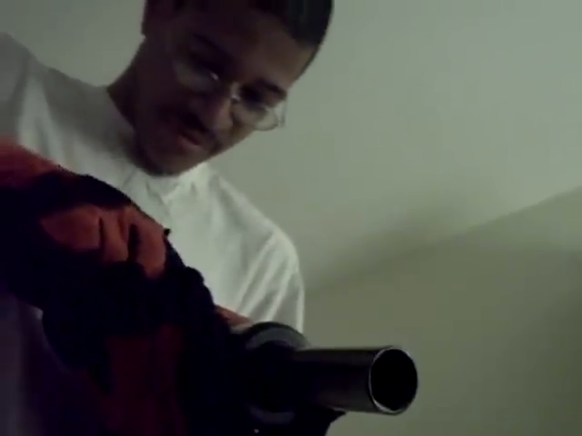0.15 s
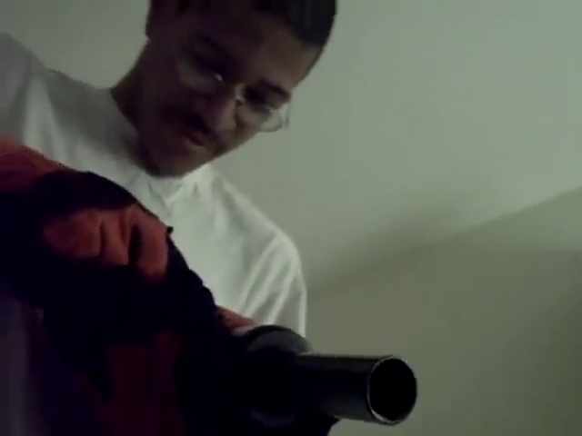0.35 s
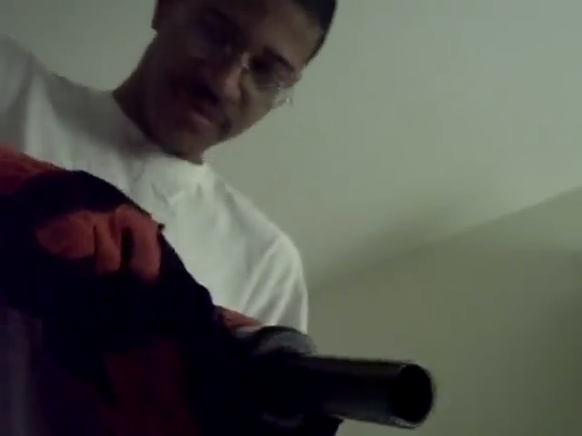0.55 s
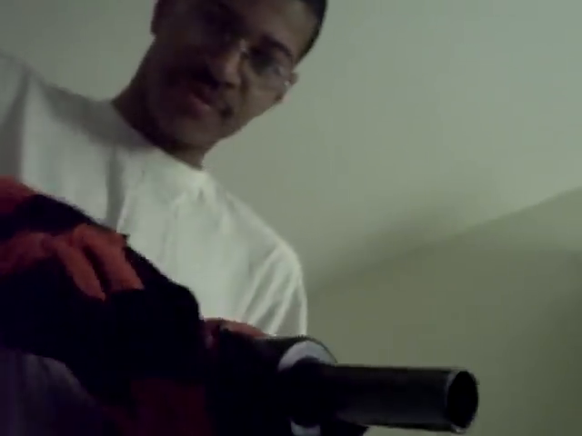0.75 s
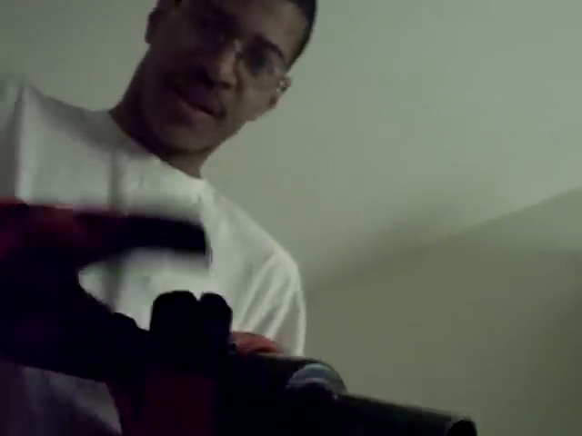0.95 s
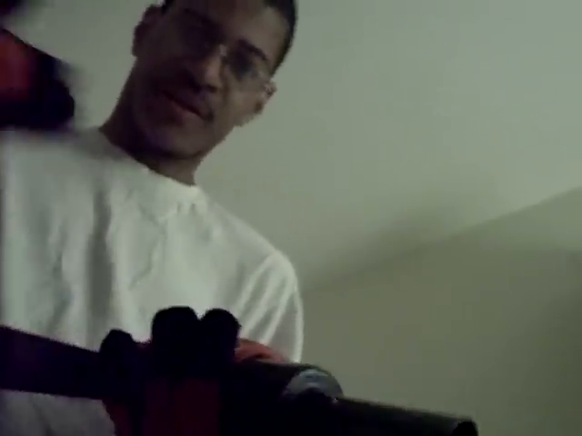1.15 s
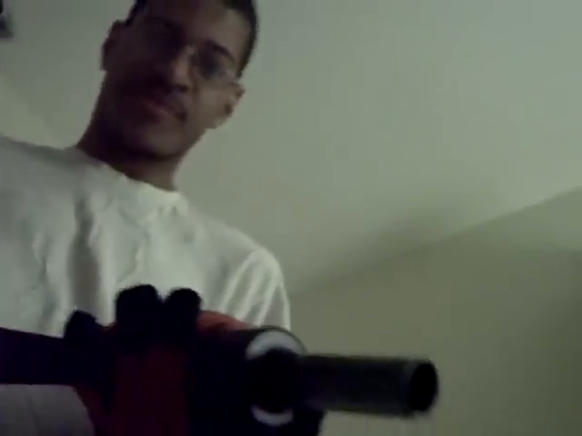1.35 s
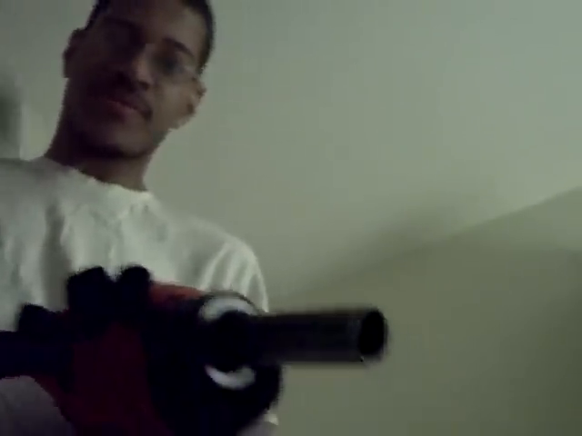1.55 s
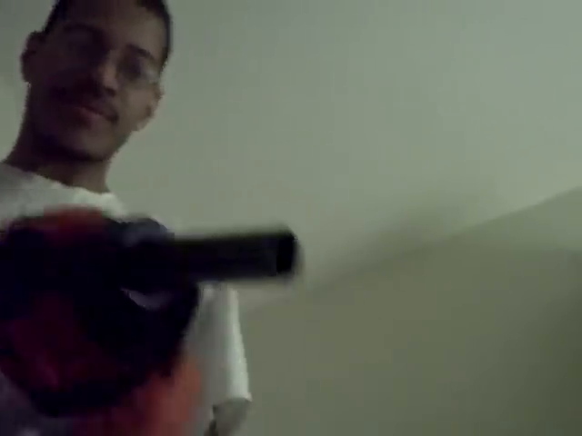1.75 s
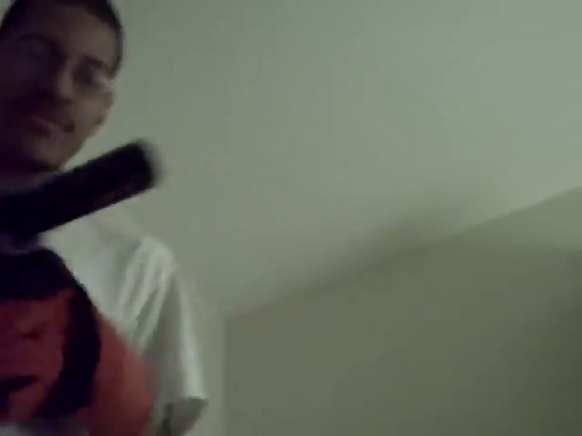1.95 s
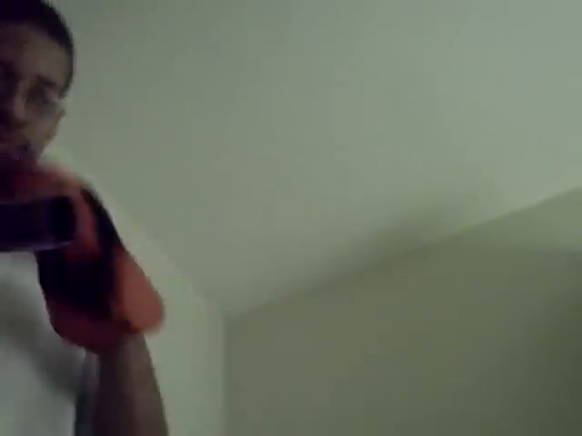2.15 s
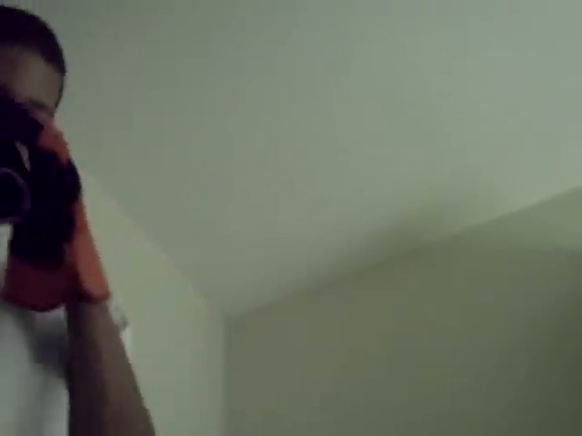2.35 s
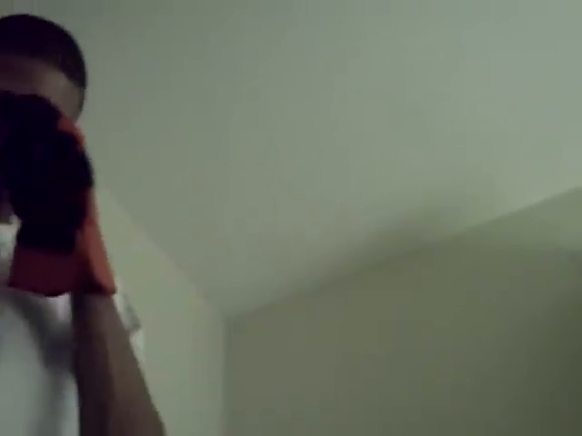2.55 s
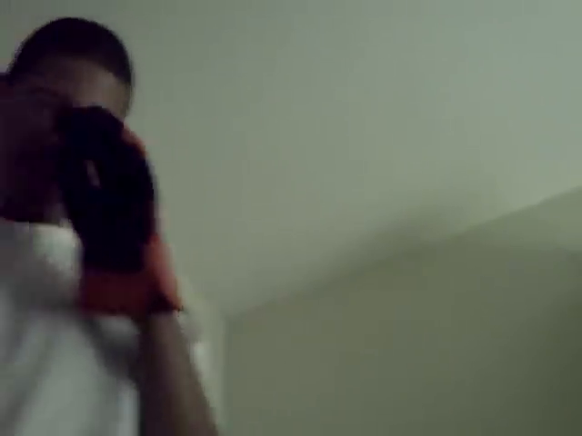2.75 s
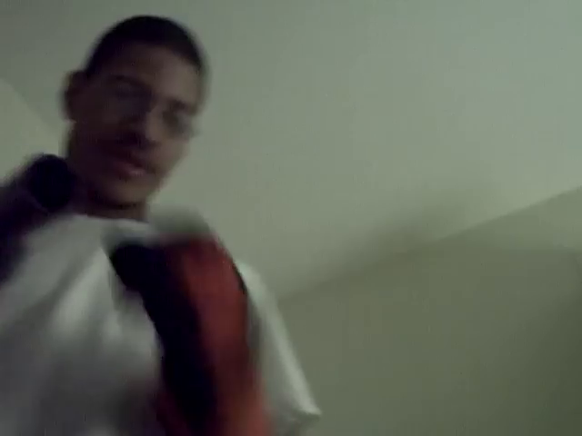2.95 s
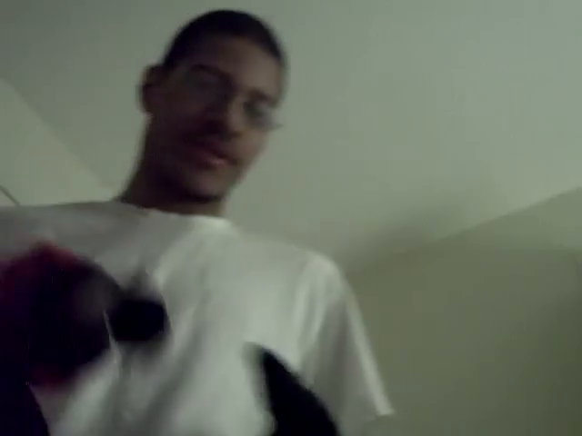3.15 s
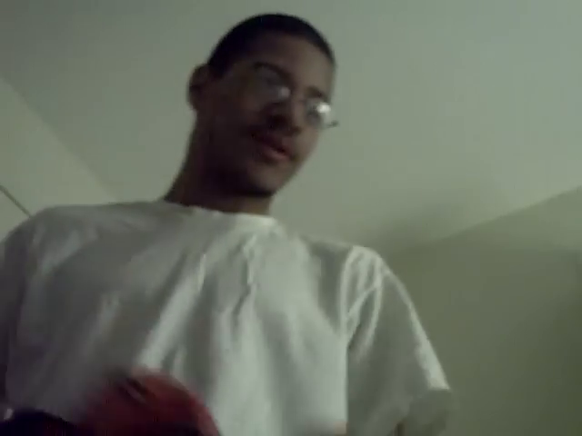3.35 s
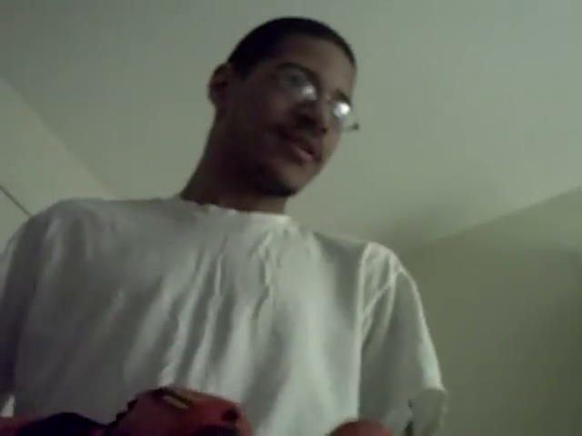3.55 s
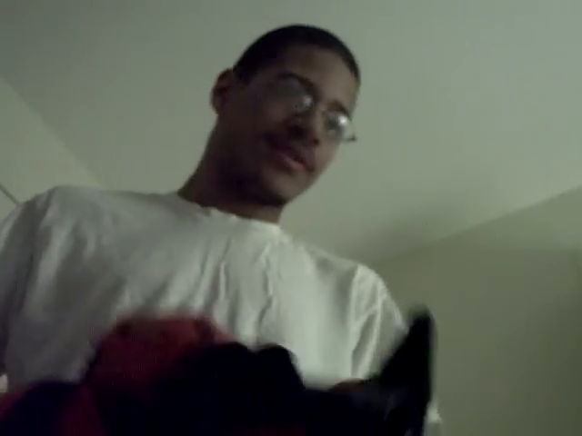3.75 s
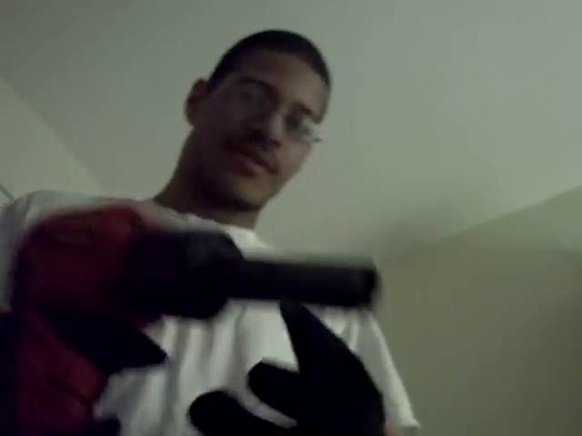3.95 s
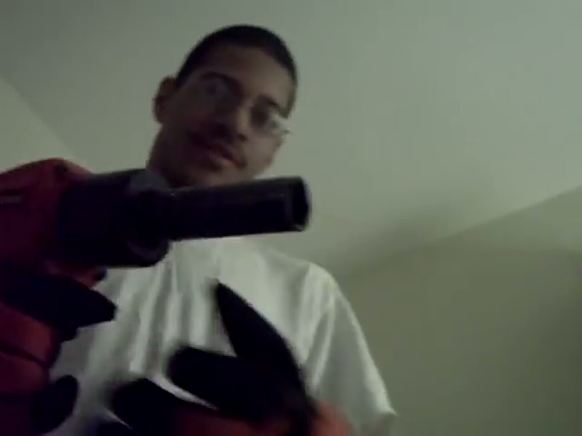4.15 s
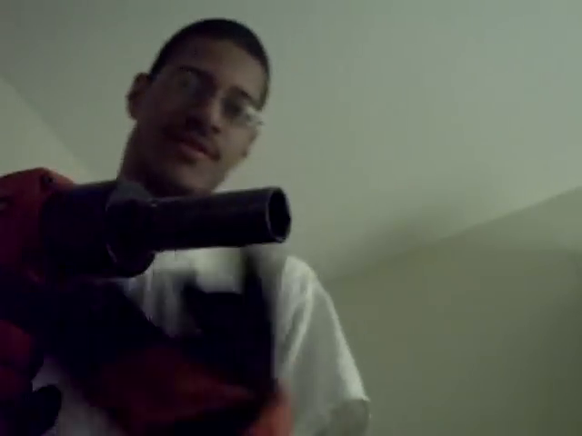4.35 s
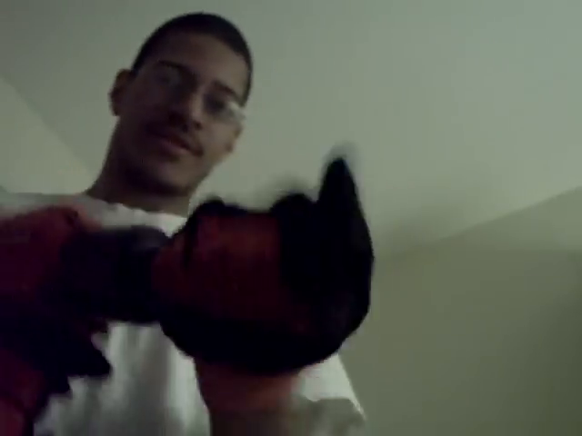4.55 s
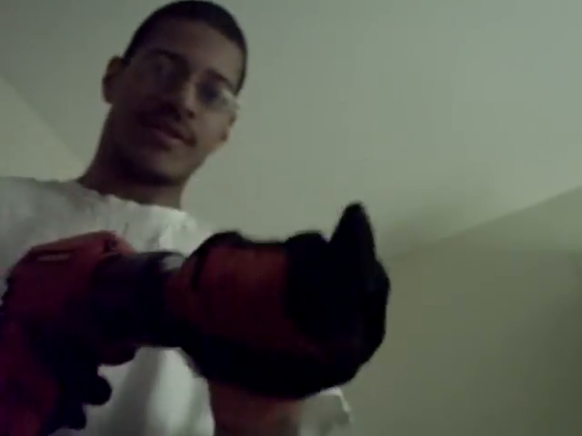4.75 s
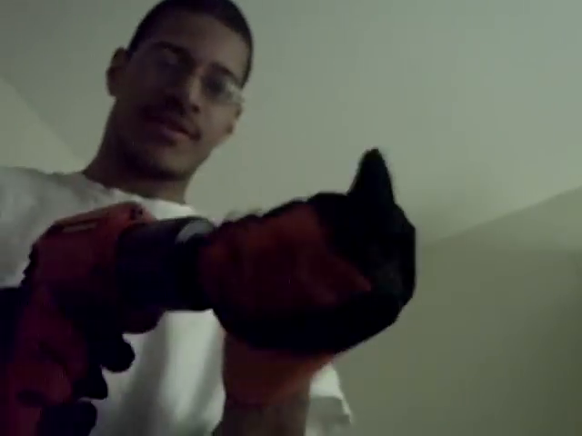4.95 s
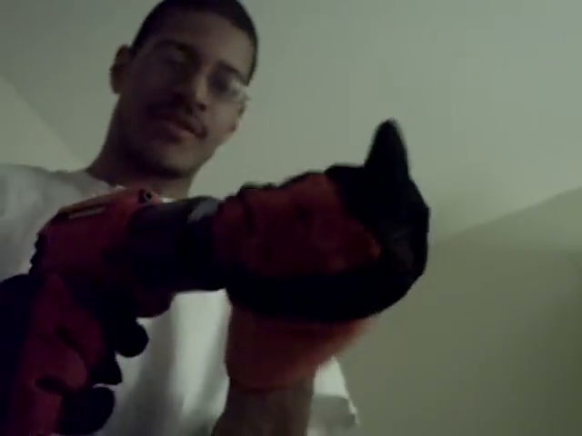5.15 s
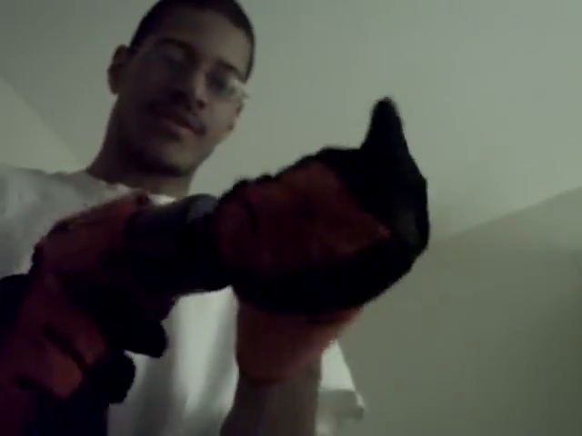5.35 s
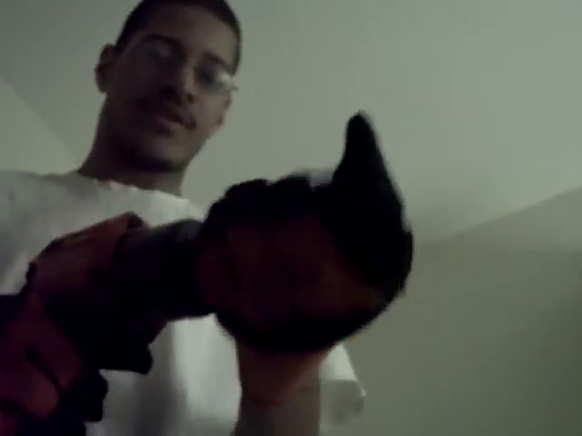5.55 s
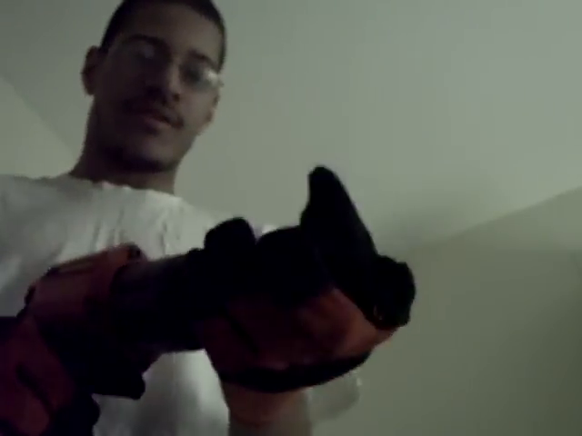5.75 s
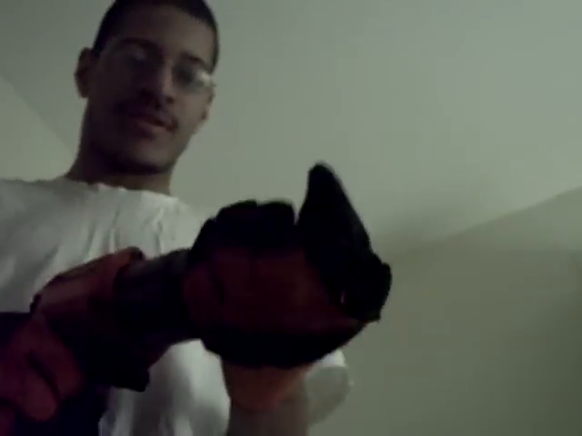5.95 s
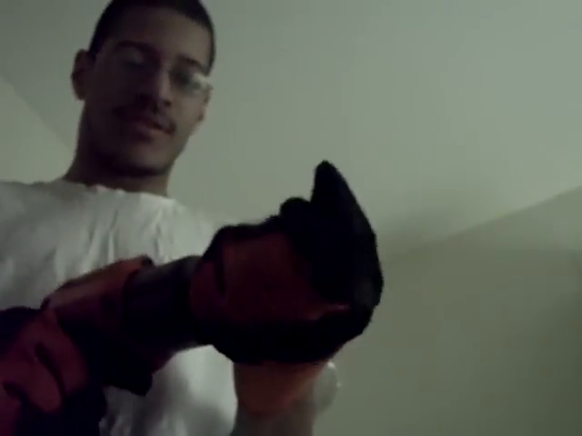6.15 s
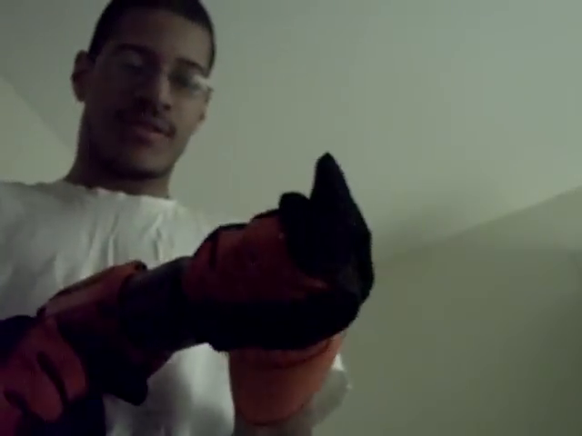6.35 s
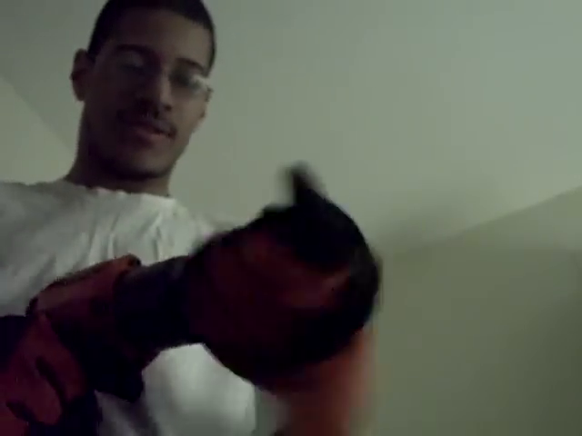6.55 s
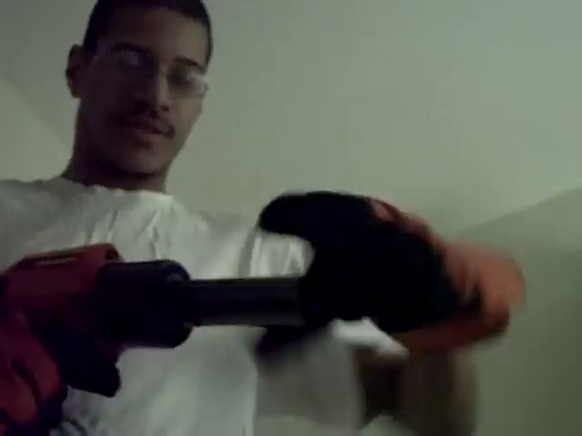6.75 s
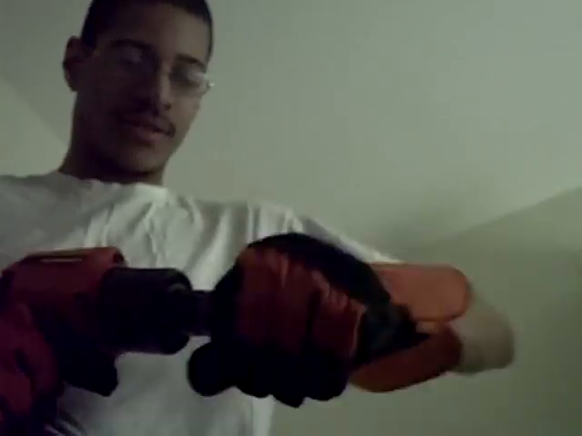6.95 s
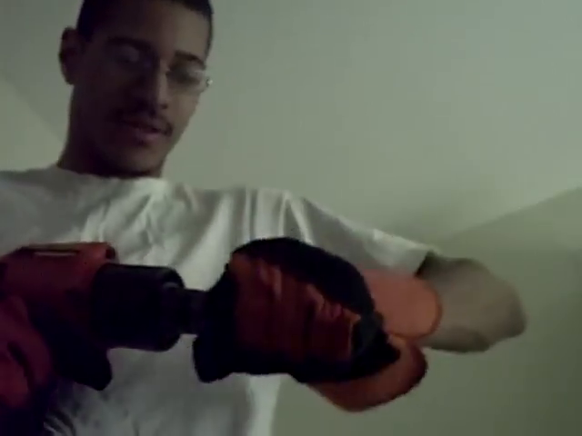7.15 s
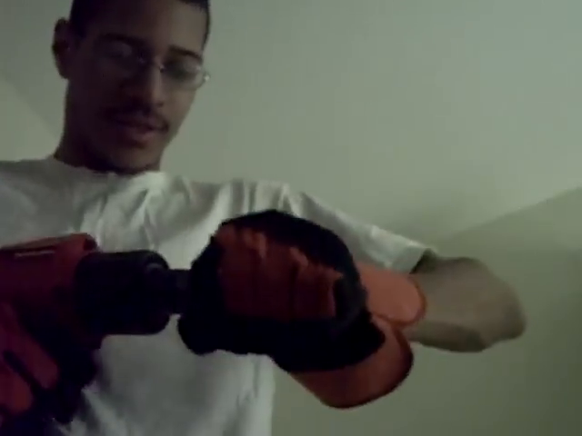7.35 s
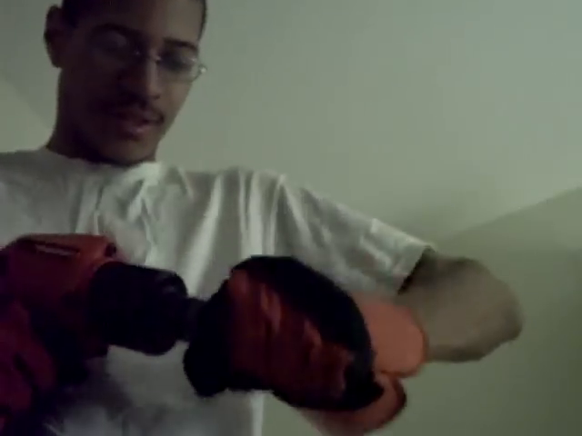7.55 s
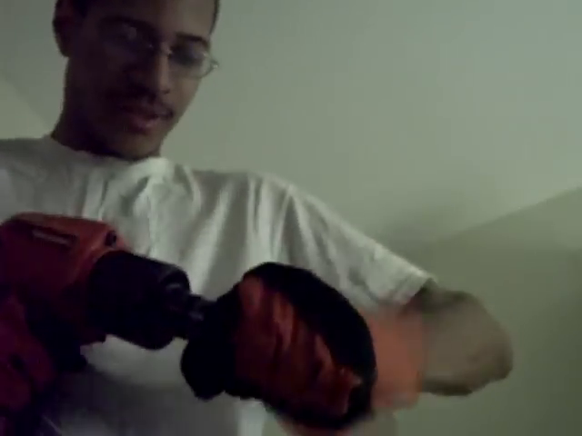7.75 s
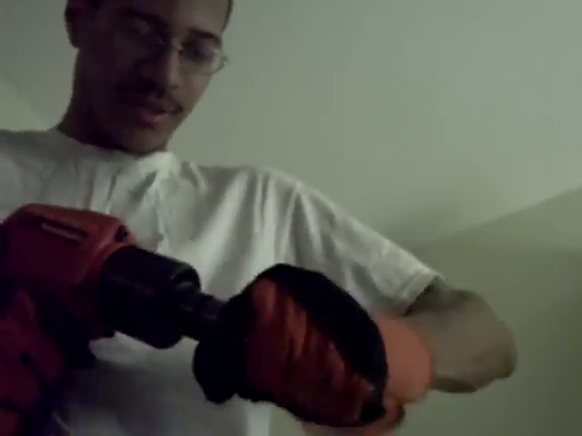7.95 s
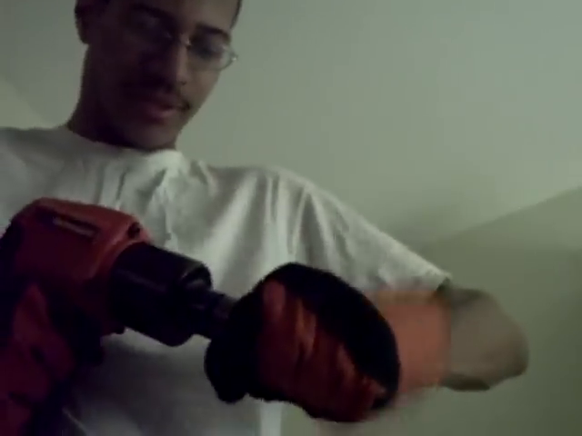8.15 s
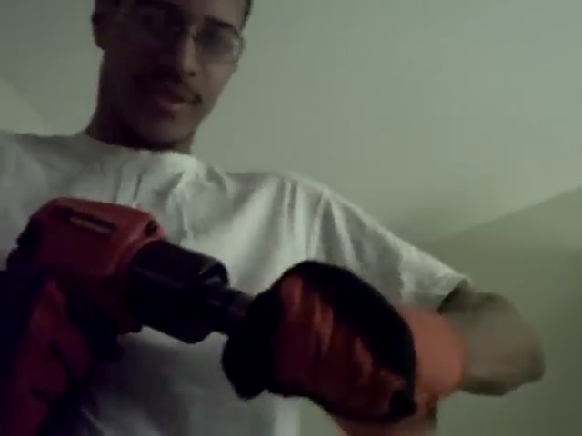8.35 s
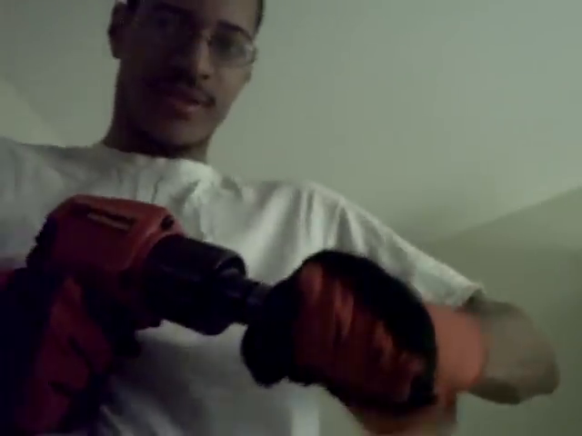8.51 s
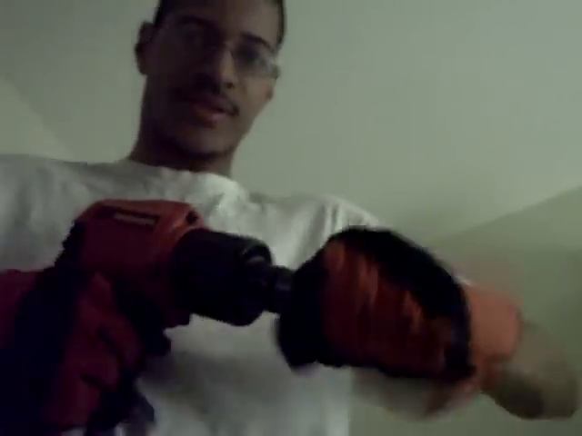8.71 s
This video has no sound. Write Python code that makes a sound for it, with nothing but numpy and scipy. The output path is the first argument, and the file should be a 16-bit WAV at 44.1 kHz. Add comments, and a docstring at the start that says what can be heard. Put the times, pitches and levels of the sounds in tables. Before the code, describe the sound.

A piston compressor hums steadily with a low buzzing drone, thin whistle and airy hiss. After nearly five seconds a pneumatic impact wrench fires close to a small camera microphone: about eight rapid clanking blows with puffing exhaust. The hum returns alone for two seconds, then a longer, louder run of about sixteen blows rattles out and stops near the end. Short hard garage reflections; peaks distort.

```python
"""Air impact wrench in a garage

An air wrench is fired twice close to a small camera, its socket held back by a gloved hand.
In each stroke the socket knocks, then the air motor speeds up with quickening puffs of exhaust noise and air.
The hammer's blow is a burst of noise that clanks and rings; a steady hiss lasts while the trigger is held.
Behind, a piston compressor hums in harmonics, whistles and hisses; the man leaning in shadows some of its hum.
The walls throw the wrench back, and the loudest peaks are flattened by the overloaded microphone circuit."""
import sys
import numpy as np
from scipy import signal
from scipy.fft import rfft, irfft, next_fast_len
from scipy.io import wavfile
from scipy.ndimage import uniform_filter1d, map_coordinates

SR = 44100
rng = np.random.default_rng(int(sys.argv[2]) if len(sys.argv) > 2 else 0)


def output_pcm(signal):
    """Save a mono or channel-first signal as 16-bit PCM at the path in sys.argv[1].

    Samples are clipped to [-1, 1] before scaling.
    """
    pcm = np.clip(np.atleast_2d(signal).T, -1, 1) * 32767
    wavfile.write(sys.argv[1], SR, np.round(pcm).astype(np.int16))


N = 387191
T = np.arange(N) / SR  # time of every sample, s
SHAFT_HZ = 56.385  # compressor turns per second

# wrench strokes: hammer blow t/s, wind-up before it t/s, relative blow level/dB
STROKES = [(4.856, 0.029, -4), (4.929, 0.027, -3), (4.986, 0.028, -2), (5.083, 0.038, -2),
           (5.175, 0.033, -8), (5.262, 0.027, -8), (5.357, 0.035, -2), (5.448, 0.051, -3),
           (7.541, 0.038, 3.5), (7.577, .023, 0), (7.659, 0.031, -3), (7.743, .027, 1), (7.821, .031, -2),
           (7.901, .029, -3.5), (7.980, .031, 0), (8.061, 0.027, -1), (8.142, .035, -4), (8.229, 0.034, -1),
           (8.311, 0.026, -1), (8.396, 0.032, -2), (8.481, 0.03, 1), (8.563, .028, -2.5),
           (8.644, .030, 4.5), (8.730, 0.028, -1)]
# trigger pulls: start t/s, end t/s, relative throttle hiss level/dB, puff pitch at top speed f/Hz,
# relative puff level/dB, relative socket knock level/dB
PULLS = [(4.792, 5.465, -25, 530, 6, -5.5), (7.478, 8.79, -29, 617, 7.5, -8)]


def undb(db):
    """Turn decibels into a gain."""
    return 10 ** (np.asarray(db) / 20)


def unit(x):
    """Scale a sound to an rms level of 1."""
    return x / np.sqrt(np.mean(x ** 2))


def curves(table):
    """Draw each column of a table against its times, at every sample."""
    s, *columns = np.transpose(table)
    return [np.interp(T, s, column) for column in columns]


def add(track, s, sound):
    """Mix a sound into the track at time s."""
    i = int(s * SR)
    track[i:i + len(sound)] += sound[:max(N - i, 0)]


def colour(x, points, peaks=()):
    """Filter by (Hz, dB) points plus (Hz, width in Hz, dB) resonances, with no sound ahead of its cause."""
    size = 2 * next_fast_len(len(x) // 2 + 4096)
    f = np.fft.rfftfreq(size, 1 / SR)
    hz, db = np.transpose(points)
    power = undb(np.interp(np.log(f + 1), np.log(hz), db)) ** 2
    for centre, width, peak_db in peaks:
        power = power + undb(peak_db) ** 2 / (1 + ((f - centre) / width) ** 2) ** 2
    # folding the cepstrum (the spectrum of the log spectrum) onto positive times removes pre-echo
    cepstrum = irfft(np.log(power) / 2)
    cepstrum[1:size // 2] *= 2
    cepstrum[size // 2 + 1:] = 0
    response = np.exp(rfft(cepstrum))
    return irfft(rfft(x, size) * response)[:len(x)]


def walk(rate):
    """Wander by chance with a spread near 1, through 'rate' random points per second."""
    knots = rng.standard_normal(int(N / SR * rate) + 2)
    return np.interp(T * rate, np.arange(len(knots)), knots)


def fade(t, t60):
    """Die away exponentially, 60 dB down after t60 seconds."""
    return undb(-60 * t / t60)


def pull_at(s):
    """Find the row of the latest trigger pull begun before time s."""
    return [pull for pull in PULLS if pull[0] < s][-1]


def motor(speed_up=1.893, swell=0.49, glide=0.53, cycles=0.43, skew=0.14, scatter_db=3.0,
          rush_db=-27, rush_t60=0.027, leak_db=-35, first_db=-12):
    """The rotor speeds up evenly; each vane passing the port lets out a puff, shorter and harder with speed."""
    # how the exhaust port radiates the puffs: f/Hz, level/dB
    port = [(20, -1.5), (60, 2.5), (110, -2.5), (180, 1), (300, 0), (480, -3), (750, 1), (1300, 1.5),
            (3000, -4)]
    # rush of the exhaust air: f/Hz, level/dB
    exhaust = [(40, 14), (150, 8), (400, 1), (1000, 20.5), (1900, 8), (2800, 2.5), (4000, 3), (6500, -6),
               (9300, 3), (12000, -17)]
    usual_wind_up_s, haste = 0.026, 1.14  # a quicker wind-up than usual makes stronger puffs
    vane_gap_s, lead_s, first_s = .0068, .0015, .011  # mean puff gap; last puff before blow; weak puff before start
    puffs, flow, leak = np.zeros(N), np.zeros(N), np.zeros(N)
    t = np.arange(-SR // 200, SR // 25) / SR
    for blow, wind_up, _ in STROKES:
        _, _, _, puff_hz, puff_db, _ = pull_at(blow)
        push = undb(puff_db) * (usual_wind_up_s / wind_up) ** haste
        start, span = blow - wind_up, wind_up - lead_s
        count = int(round(span / vane_gap_s)) + 1
        # equal steps of turning make equal steps in speed squared
        speeds = np.sqrt(np.linspace(1 / speed_up ** 2, 1, count))  # share of the top speed
        times = start + span * (speeds - speeds[0]) / (1 - speeds[0])
        vanes = [(start - first_s, speeds[0], first_db)]  # a weak puff as the rotor breaks free
        vanes += [(s, speed, 0) for s, speed in zip(times, speeds)]
        chance = rng.standard_normal((12, 3))
        for (s, speed, db), (late, loud, sharp) in zip(vanes, chance):
            s = s + 0.00032 * late + t[0]
            size = push * undb(db + scatter_db * loud) * speed ** swell
            phase = t * puff_hz * speed ** glide * (1 + sharp / 12)
            puff = -np.cos(2 * np.pi * phase + skew) * np.exp(-(phase / cycles) ** 2)
            add(puffs, s, size * puff)
            add(flow, s, size * (t > 0) * fade(np.abs(t), rush_t60))
        # air slips past the vanes through the wind-up and on while the rotor stands
        leak[(T > start) & (T < blow + .035)] = 1
    air = (undb(rush_db) * flow + undb(leak_db) * leak) * rng.standard_normal(N)
    return colour(puffs, port) + colour(air, exhaust)


def hammer(tick_db=-1, tick_t60=0.018, clank_db=-1, clank_t60=0.043, knock_t60=0.016, rattle_db=-6,
           rattle_s=.05, ring_db=-29, grit_db=0.5, vary_db=2.5):
    """Steel strikes steel: gritty contacts clank in the case and ring anvil and socket, damped by the glove.
    The loose socket knocks on the drive square as each wind-up begins, and rattles once more soon after."""
    # sharp tick of anvil and socket: f/Hz, level/dB
    steel = [(200, 0.5), (600, 6.5), (1500, -12), (2900, 1), (3800, -6.5), (4900, -1.5), (6300, -6),
             (8000, 0.5), (9300, 4.5), (10500, 1.5), (12000, -2.5)]
    # ringing modes of the steel: f/Hz, time to fall 60 dB t/s, relative level/dB
    rings = [(3070, 0.093, 8), (4810, 0.061, 2.5), (5130, .13, -12), (7700, .07, -11), (9700, .06, 9),
             (10100, .05, -4)]
    # clank of the hammer case: f/Hz, level/dB
    case_tone = [(100, -23), (300, 7), (700, 7.5), (1250, -2), (1620, 5), (2050, -3.5), (2750, -1),
                 (3400, -10.5), (4200, -12), (6000, -14.5), (12000, -12)]
    seating_s, seating_db = 4.804, -6.5  # the socket clicks into its seat on the first pull
    t = np.arange(SR // 5) / SR
    anvil, case = np.zeros(N), np.zeros(N)  # loudness of the contacts over time
    for blow, wind_up, db in STROKES:
        clank_size, knock_size, rattle_size = undb(vary_db * rng.standard_normal(3))
        add(anvil, blow, undb(tick_db + db) * fade(t, tick_t60))
        add(case, blow, undb(clank_db) * clank_size * fade(t, clank_t60))
        *_, knock_db = pull_at(blow)
        knock = undb(knock_db) * fade(t, knock_t60)
        start = blow - wind_up
        add(anvil, start, knock_size * knock)
        add(anvil, start + rattle_s * rng.random(), undb(rattle_db) * rattle_size * knock)
    add(anvil, seating_s, undb(seating_db) * fade(t, knock_t60))
    contacts = unit(undb(grit_db * walk(1200)))  # the faces bounce unevenly
    chatter = anvil * contacts * rng.standard_normal(N)
    clank = colour(case * contacts * rng.standard_normal(N), case_tone)
    ring = sum(undb(db) * np.sin(2 * np.pi * hz * t) * fade(t, t60) for hz, t60, db in rings)
    ringing = signal.fftconvolve(chatter, ring / 10)[:N]
    return clank + colour(chatter, steel) + undb(ring_db) * ringing


def throttle():
    """Air squeezing through the throttle valve hisses thinly for as long as the trigger is held."""
    # tone of the throttle hiss: f/Hz, level/dB
    valve_tone = [(100, -30), (3500, -4), (4500, -1), (5000, 5.5), (5600, -3.5), (8000, -0.5), (10500, 2),
                  (12500, -29)]
    opening = sum(undb(db) * ((T > start) & (T < end)) for start, end, db, *_ in PULLS)
    opening = uniform_filter1d(opening, size=600)  # soften the on and off edges
    return colour(opening * rng.standard_normal(N), valve_tone)


def garage(x, t60=0.28, wet_db=-12, first_s=0.0061, sparse_db=2, shift_rate=1.7):
    """Ceiling and walls reflect the sound; the pattern keeps changing as the tool shakes in the hands."""
    # what the garage walls give back: f/Hz, level/dB
    walls = [(60, -32), (200, -1), (450, -2.5), (700, -2.5), (1100, 2.5), (2000, 4.5), (3000, 4.5),
             (5000, 1.5), (10000, 2.5), (13000, -4)]
    t = np.arange(SR // 2) / SR
    out = 0
    for weight in (np.cos, np.sin):  # swing between two echo patterns
        tail = rng.standard_normal(len(t)) * undb(sparse_db * rng.standard_normal(len(t)))
        tail *= fade(t, t60) * np.clip(t / first_s - 1, 0, 1)  # silent until first_s
        tail /= np.sqrt(np.sum(tail ** 2))
        out = out + signal.fftconvolve(x * weight(2 * np.pi * shift_rate * T), tail)[:N]
    return undb(wet_db) * colour(out, walls)


def compressor(repeat=0.47, throb=0.084, draught_throb=0.15):
    """Each turn of the shaft drives hum, reed whistle, intake draught and a partly repeating valve hiss."""
    # air drawn through the compressor: f/Hz, level/dB per Hz
    draught_tone = [(20, -88), (100, -76.5), (250, -72), (400, -65), (620, -66.5), (900, -65),
                    (1250, -72.5), (1550, -65.5), (2000, -84.5), (3000, -79), (12000, -130)]
    # intake resonances: f/Hz, width f/Hz, level/dB per Hz
    intake = [(486.3, 6, -46.5), (748, 23, -53.5), (800, 25, -54), (1049, 33, -60)]
    # hiss of the compressor valves: f/Hz, level/dB per Hz
    valves = [(800, -100), (1900, -71.5), (2400, -81), (2900, -79.5), (3300, -81), (4500, -78.5),
              (5700, -80.5), (7600, -76), (9600, -76), (11000, -78.5), (11900, -82.5), (12500, -120)]
    # valve resonances: f/Hz, width f/Hz, level/dB per Hz
    reeds = [(2800, 110, -78), (3682, 73, -72.5), (4340, 74, -77), (6900, 66, -81), (8790, 32, -62.5),
             (9050, 160, -67)]
    # a valve reed whistles on one harmonic: t/s, level before flicker/dB
    whistle_level = [(0, -55), (3, -50), (3.5, -44.5), (8.78, -46)]
    whistle_order = 48  # multiple of the shaft rate
    turns = SHAFT_HZ * T + walk(9) / 1000  # the turning is slightly uneven
    cycle = np.cos(2 * np.pi * turns)
    per_hz = np.sqrt(SR / 2)  # makes the noise levels count per Hz
    # noise for one turn, played again each turn
    one_turn = unit(irfft(np.exp(2j * np.pi * rng.random(int(SR / SHAFT_HZ / 2)))))
    rattle = map_coordinates(one_turn, [turns % 1 * len(one_turn)], order=5, mode="grid-wrap")
    share = np.clip(repeat, 0, 1)
    hiss = np.sqrt(share) * rattle + np.sqrt(1 - share) * rng.standard_normal(N)
    hiss *= 1 + throb * cycle
    draught = rng.standard_normal(N) * (1 + draught_throb * cycle)
    whistle_gain = undb(curves(whistle_level)[0] + 1.3 * walk(14))
    whistle = whistle_gain * np.sin(2 * np.pi * whistle_order * turns)
    air = colour(hiss, valves, reeds) + colour(draught, draught_tone, intake)
    return hum(turns) + whistle + per_hz * air


def hum(turns, waver_db=.5, drift_db=0.85, drift_rate=1.114, shadow_hz=600, diffuse_hz=420):
    """Piston strokes sound in harmonics; the man's body shadows some, and upper ones drift as he moves."""
    # harmonics shaped by the room's standing waves: multiple of the shaft rate, level before changes/dB
    harmonics = [(1, -34.5), (2, -42.5), (3, -39.5), (4, -31), (5, -30.5), (6, -35), (7, -20), (8, -32),
                 (9, -27), (10, -42), (11, -41), (12, -33), (13, -29), (14, -35), (15, -35), (16, -29.5),
                 (17, -34), (18, -47), (19, -26.5), (20, -39), (21, -46.5), (22, -40.5), (23, -46),
                 (24, -45.5), (25, -57), (26, -35.5), (27, -44.7), (28, -52), (29, -43), (30, -49.5)]
    # harmonics that change while he leans in: multiple of the shaft rate, change at full lean level/dB
    shadow = [(5, -1), (6, -1.5), (7, -4.5), (8, -3.5), (9, -9), (11, 6.5), (12, -10.5), (14, -17),
              (22, 6.5), (26, -2)]
    # how far the man leans over the camera: t/s, share 0-1
    lean_in = [(0, 1), (1.3, 0.92), (2.3, 0.02), (4.3, 0), (5.6, 0.14), (8.78, 0.28)]
    # swell of the upper harmonics, less for low ones: t/s, level/dB
    hum_swell = [(0, 0.5), (1, 0.5), (1.6, -1.5), (2.4, 2), (4.2, 0.5), (5.6, -0.1), (8.78, 0.5)]
    lean, = curves(lean_in)
    swell_db, = curves(hum_swell)
    out = 0
    for k, (_, db) in enumerate(harmonics, 1):
        hz = k * SHAFT_HZ
        shadow_db = sum(change for multiple, change in shadow if round(multiple) == k)
        short = min(hz / shadow_hz, 1) ** 2  # short waves feel the body most
        moving_db = swell_db + drift_db * walk(drift_rate) + waver_db * walk(25)
        gain = undb(db + lean * shadow_db + short * moving_db)
        # long waves arrive together, as one chug a turn
        lag = rng.random() * min(hz / diffuse_hz, 1) ** 4
        out = out + gain * np.sin(2 * np.pi * (k * turns + lag))
    return out


def scene():
    """Mix the wrench close by, its reflections, and the compressor behind."""
    wrench = motor() + hammer() + throttle()
    return (wrench + garage(wrench) + compressor())[None]


def record(dry):
    """The preamplifier flattens the peaks; the camera then shapes the tone and rolls off the top, without delay."""
    # response of the camera after its preamplifier: f/Hz, level/dB
    camera = [(20, 2), (9000, -1), (10000, -2), (11000, -9), (12000, -16.5), (13000, -21), (14000, -27),
              (15500, -27)]
    rail, knee, top_hz = .71, 12, 16200  # loudest amplitude; sharpness of the flattening; top cutoff, Hz
    fine = signal.resample_poly(dry[0], 2, 1)  # twice the rate, so that flattening aliases less
    flattened = fine / (1 + np.abs(fine / rail) ** knee) ** (1 / knee)
    clipped = signal.resample_poly(flattened, 1, 2)
    size = 2 * next_fast_len(N // 2 + 4096)
    response = undb(np.interp(np.fft.rfftfreq(size, 1 / SR), *np.transpose(camera)))
    toned = irfft(rfft(clipped, size) * response)[:N]
    top = signal.ellip(8, .1, 50, top_hz, fs=SR, output="sos")
    return signal.sosfiltfilt(top, toned)[None]


dry = scene()
out = record(dry)
output_pcm(out)
```